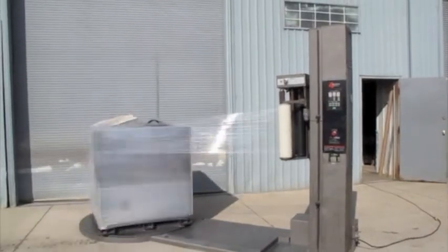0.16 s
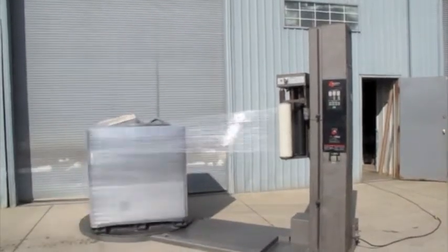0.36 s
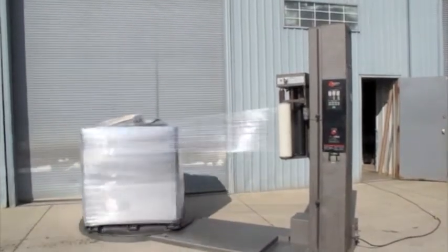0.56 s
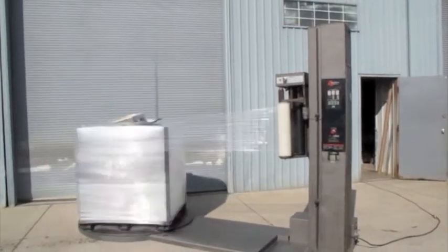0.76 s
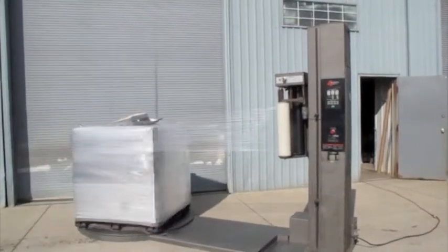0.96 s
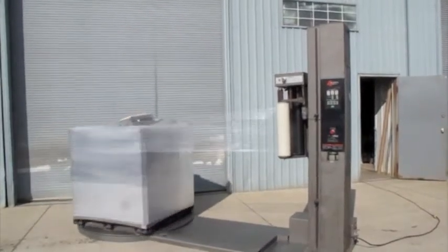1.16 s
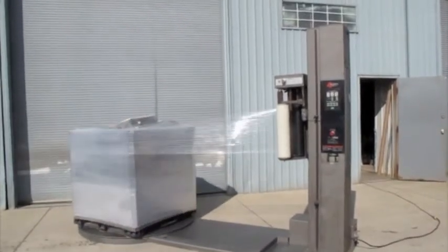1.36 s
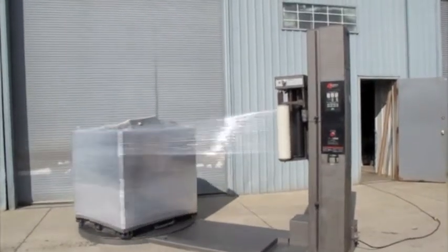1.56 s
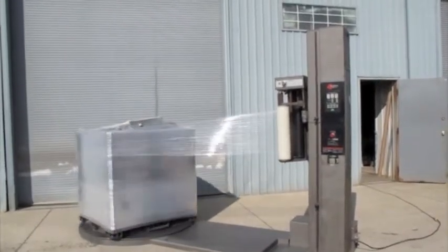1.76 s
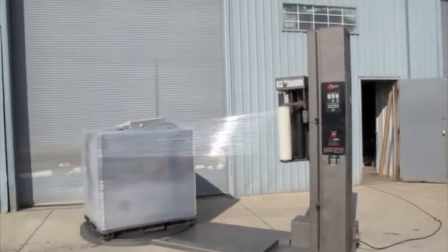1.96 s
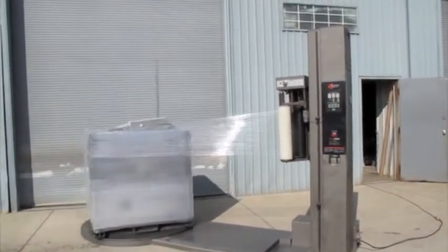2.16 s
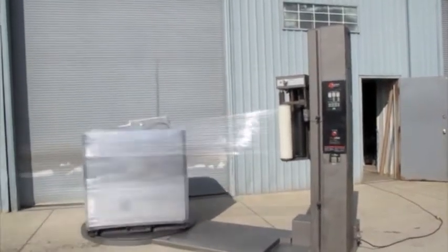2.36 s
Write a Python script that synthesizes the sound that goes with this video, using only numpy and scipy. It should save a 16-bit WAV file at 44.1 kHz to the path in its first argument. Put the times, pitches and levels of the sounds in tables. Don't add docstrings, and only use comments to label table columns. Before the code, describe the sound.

A machine motor drones low and swells while stretch film crackles and chain links knock on metal

```python
import sys
import numpy as np
from scipy import signal
from scipy.fft import rfft, irfft, next_fast_len
from scipy.io import wavfile
from scipy.ndimage import uniform_filter1d, map_coordinates

SR = 44100
rng = np.random.default_rng(int(sys.argv[2]) if len(sys.argv) > 2 else 0)


def invert_db(x):
    u = np.asarray(x, float) / 20
    return 10 ** u


def pcm_store(signal):
    levels = np.round(np.clip(np.atleast_2d(signal), -1, 1) * 32767)
    wavfile.write(sys.argv[1], SR, levels.astype(np.int16).T)


N = 111573

# frequency in Hz, density in dB per Hz.
MIC_SPECTRUM = [(3000, -16), (10000, 1), (15800, -15)]
# frequency in Hz, density in dB per Hz.
RUMBLE_SPECTRUM = [(10, 12), (22, 1.5), (42, 0), (60, -1), (90, 1), (140, -4), (230, -12), (350, -19)]
# time in seconds, gain in dB.
RUMBLE_SWELL = [(0, 0), (.4, 4.5), (.8, 3.5), (1.1, -1.5), (1.3, 2), (1.7, 3.5), (2.1, 2.5), (2.53, 3)]
# time in seconds, throb rate in Hz, level in dB.
ROLLER_THROB = [(0.0, 37.7, -20), (0.35, 39.1, -30), (0.53, 30.9, -31), (0.72, 40.3, -40),
                (0.87, 39.1, -31), (0.95, 32.8, -25), (1.55, 35.1, -23), (1.722, 29.2, -38),
                (1.87, 28.5, -57), (2.11, 34.42, -27), (2.4, 35.55, -23.5), (2.53, 31.8, -24)]
# frequency in Hz, rms level in dB, unsteadiness in dB.
ELECTRIC_TONES = [
    (120, -39, 1),
    (480, -46.5, .8),
    (560, -59, 2),
    (2932, -68, 2),
    (3654, -68, 2),
    (5387, -73, 2),
]
# time in seconds, level in dB.
SQUEAL_LEVEL = [
    (0, -68),
    (1.66, -68),
    (1.8, -56),
    (1.98, -55.5),
    (2.06, -69),
    (2.53, -69),
]
# time in seconds, level in dB.
BOOM_LEVEL = [(0, -43.5), (.15, -37), (.55, -44.5), (.8, -49), (1.3, -44), (2.2, -40.5), (2.53, -48)]
# frequency in Hz, width in Hz, level in dB.
DECK_MODES = [(231.5, 14, 0)]
# time in seconds, level in dB.
MOAN_LEVEL = [(0, -61), (.3, -37), (.5, -48), (.8, -47), (1.05, -32.5), (1.25, -42.5), (1.7, -51),
              (2.1, -45), (2.53, -55)]
# frequency in Hz, width in Hz, level in dB.
CASE_MODE = (101, 5, 0)
# start in seconds, level in dB, pitch in Hz, fade T60 in seconds.
PALLET_GROANS = [
    (.0, -35.5, 462, 0.17),
    (1.5, -48, 341.5, 1.3),
    (.33, -41.5, 726, 0.58),
    (.9, -44, 289, 1.2),
    (2.03, -38.5, 334.5, 0.3),
    (2.12, -37.5, 516, 0.38),
]
# start in seconds, peak in dB, pitch in Hz.
KNOCK_RINGS = [(.046, -45, 844), (.169, -52, 816), (.211, -38, 876), (.263, -38, 802), (.392, -55, 758),
               (.456, -42.5, 831), (.651, -36.5, 786), (.791, -36.5, 859), (.818, -42, 872),
               (.834, -35.5, 823), (1.002, -37, 790), (1.149, -34.5, 840), (1.19, -37.5, 806),
               (1.231, -46, 828), (1.372, -34, 832), (1.413, -39, 876), (1.587, -40, 870),
               (1.623, -35, 842), (1.687, -47, 788), (1.815, -33.5, 846), (1.954, -35.5, 816),
               (2.008, -47, 787), (2.11, -35.5, 827), (2.214, -40, 836)]
# start in seconds, peak in dB, fade T60 in seconds.
FILM_SNAPS = [(.115, -65, .12), (.253, -68, .12), (.345, -66, .1), (.38, -66, .15), (.46, -63, .08),
              (.755, -64, .15), (.88, -68, .1), (.98, -67, .12), (1.072, -66, 0.074), (1.134, -57, 0.074),
              (1.155, -56, 0.069), (1.785, -67, 0.15), (2.084, -56, 0.19)]
# frequency in Hz, density in dB per Hz.
SNAP_SPECTRUM = [(8500, -30), (10000, 0), (12500, -3), (14000, -16), (15800, -25)]
# start in seconds, peak in dB, fade T60 in seconds, treble over middle in dB.
FILM_PEELS = [(0.0014, -34, 0.11, -11.5), (0.064, -36.5, 0.6, -4), (0.108, -31.5, 0.12, -1.5),
              (0.252, -31.5, 0.13, 1), (0.2894, -40.5, 0.37, -2), (0.342, -33, 0.2, -7.5),
              (0.3755, -30.5, 0.25, 2.5), (0.5606, -40.5, 0.28, 0), (0.5894, -40, 0.22, -1),
              (0.6704, -44.5, 0.63, -2), (0.7503, -29.5, 0.17, -0.5), (0.839, -39.5, 0.59, -1),
              (0.921, -40, 0.43, -4.5), (0.979, -32, 0.12, 1), (1.07, -36.5, 0.21, -7),
              (1.1837, -36.5, 0.12, 0), (1.2594, -49, 0.6, 5), (1.3608, -39.5, 0.19, 3),
              (1.4064, -37.5, 0.23, -6), (1.503, -40, 0.52, 0.5), (1.705, -39, 0.17, 1),
              (1.752, -45, 0.12, 10), (1.93, -48, .3, 5), (1.7814, -41.5, 0.87, -5),
              (1.9686, -41, 0.34, 1.5), (2.0813, -27.5, 0.19, 0), (2.177, -35.5, 0.35, -5),
              (2.244, -50, 0.23, 3), (2.2714, -36.5, 0.12, 3), (2.343, -33.5, 0.24, 1),
              (2.4399, -39, 0.33, -2)]
# frequency in Hz, density in dB per Hz.
CRACKLE_MIDDLE = [(1200, 2), (2000, -14), (2600, 3.5), (3700, 0.5), (5000, -3), (6500, -4)]
# frequency in Hz, density in dB per Hz.
CRACKLE_TREBLE = [(3500, -73), (5500, -4.5), (8200, 1), (9700, -11.5), (12600, -52), (15800, -38)]
# time in seconds, level in dB.
PULL_LEVEL = [(0, -44), (.1, -46.5), (.28, -43), (.53, -48.5), (.74, -48), (.82, -49), (1.15, -46),
              (1.32, -48), (1.6, -47.5), (1.85, -49), (2.07, -45), (2.16, -49), (2.25, -42.5),
              (2.42, -46.5), (2.53, -49.5)]
# frequency in Hz, density in dB per Hz.
PULL_SPECTRUM = [(2000, 0), (3600, -3), (4200, -4), (4700, -2), (7900, -0.5), (9800, -16.5), (12600, -27),
                 (15800, -36)]
# frequency in Hz, density in dB per Hz.
GEAR_SPECTRUM = [(150, -34), (260, -0.5), (385, -7), (478, -1.5), (532, -6.5), (817, -8), (954, -11),
                 (1270, -10.5), (4500, -35), (5850, -64), (9900, -120)]
# frequency in Hz, width in Hz, level in dB.
MAST_MODES = [(813, 150, 10), (1397, 154, 2), (1788, 83, 3.5), (2400, 16, 1), (2514, 30, 1), (2680, 60, -1),
              (2908, 190, -2), (3250, 31, 4.5), (3570, 61, 3), (3670, 170, 1), (4670, 240, -4)]
# frequency in Hz, gain in dB.
RATTLE_DULLING = [(200, 1), (600, 1), (5000, 2), (9000, -15), (15800, -40)]
# start in seconds, peak in dB, upper modes over lower in dB, favoured mode in Hz.
CHAIN_KNOCKS = [(0.175, -45, -12, 2660), (0.39, -49, -20, 3700), (0.646, -44, -10, 1740),
                (0.794, -29, -22, 2450), (0.826, -27, -24, 1650), (0.993, -30, -17, 1834),
                (1.142, -26.5, -15.5, 2400), (1.196, -23.5, -41, 2710), (1.375, -25, -22, 2680),
                (1.506, -44, -6, 3060), (1.616, -25.5, -16.5, 2400), (1.811, -28.5, -14.5, 1940),
                (1.96, -29.5, -14, 3200), (2.107, -28, -18, 1730), (2.275, -38.5, -5.5, 2380)]
LOWER_MODE_DB = [-16, -4]
# frequency in Hz, density in dB per Hz.
SCRAPE_SPECTRUM = [(700, -20), (1200, -3), (3600, 0), (5000, -25)]
# time in seconds, level in dB.
MOTOR_LOAD = [
    (0, -32),
    (.5, -35),
    (.8, -34.5),
    (1.2, -31),
    (1.45, -25.5),
    (1.7, -23),
    (2.53, -23),
]
# multiple of the turning rate, level in dB, growth with load in dB per dB.
DRONE_ORDERS = [(1, -0.5, 0.88), (2, -7.5, 0.88), (3, -13.5, 1.18), (4, -29.5, 0.37), (5, -51, 1.4),
                (6, -35.5, 0.19), (7, -39.5, 0.33), (10, -39, 0.28)]


def unit(x):
    return x / np.sqrt(np.mean(x ** 2) + 1e-20)


def wobble(rate):
    knots = rng.standard_normal(int(N * 40 / SR) + 9)
    return map_coordinates(knots, [np.arange(N) * rate / SR])


def curve(rows):
    return np.interp(np.arange(N) / SR, *np.transpose(rows))


def sine(hz, sway=0):
    return np.sin(2 * np.pi * np.cumsum(np.broadcast_to(hz, N)) / SR + sway)


def filtered(x, response):
    m = next_fast_len(N + SR // 2)
    return irfft(rfft(x, m) * response(np.fft.rfftfreq(m, 1 / SR)), m)[:N]


def coloured(x, spectrum):
    f, db = np.transpose(spectrum)

    def gain(hz):
        return invert_db(np.interp(np.log(hz + 1), np.log(f + 1), db, -120, -120))

    return unit(filtered(x, gain))


def grainy(spread_db):
    size_db = spread_db * np.clip(rng.exponential(size=N), 0, 5)
    return unit(rng.standard_normal(N) * invert_db(size_db))


def patchy(x, patchy_db):
    z = signal.stft(x, nperseg=256)[2]
    field = uniform_filter1d(rng.standard_normal(z.shape), size=2, axis=0)
    field = uniform_filter1d(field, size=14, axis=1)
    return unit(signal.istft(z * invert_db(patchy_db * unit(field)), nperseg=256)[1][:N])


def bursts(starts, levels_db, t60s, rise_s):
    age = np.clip(np.arange(0, N + 8, 8) / SR - np.array(starts)[:, None], 0, None)
    shape = (1 - np.exp(-age / rise_s)) * invert_db(-60 * age / np.array(t60s)[:, None])
    envelopes = np.sqrt(invert_db(2 * np.atleast_2d(levels_db)) @ shape ** 2)
    return np.repeat(envelopes, 8, axis=1)[:, :N]


def resonate(x, modes):
    def response(f):
        total = 0
        for k, (hz, width, db) in enumerate(modes):
            peak = 1j * f * width / (hz * hz - f * f + 1j * f * width)
            total = total + (-1) ** k * invert_db(db) * peak
        return total

    return filtered(x, response)


def ring(mode):
    x = resonate(rng.standard_normal(N), [mode])
    x = unit(resonate(x, [mode]))
    loudness = np.abs(signal.hilbert(x, next_fast_len(N))[:N])
    return unit(x / (loudness + .45))


def microphone_hiss():
    return invert_db(-69) * coloured(rng.standard_normal(N), MIC_SPECTRUM)


def yard_rumble():
    return invert_db(-33.5 + curve(RUMBLE_SWELL)) * coloured(rng.standard_normal(N), RUMBLE_SPECTRUM)


def yard_echo(x):
    T60_S, FIRST_ECHO_S = .89, .012
    t = np.arange(SR // 2) / SR
    tail = rng.standard_normal(len(t)) * invert_db(-60 * t / T60_S) * (t > FIRST_ECHO_S)
    return signal.fftconvolve(x, tail / np.linalg.norm(tail))[:N]


def rollers():
    s, hz, db = np.transpose(ROLLER_THROB)
    level = invert_db(curve(np.c_[s, db]) - 6 + 1.3 * wobble(19))
    return np.sqrt(2) * level * sine(curve(np.c_[s, hz]), 1.2 * wobble(11))


def hum_and_whines():
    out = np.zeros(N)
    for hz, db, sway_db in ELECTRIC_TONES:
        out += np.sqrt(2) * invert_db(db + sway_db * wobble(9)) * sine(hz, .25 * wobble(6))
    return out


def brake_squeal():
    return invert_db(curve(SQUEAL_LEVEL)) * sine(5119, .33 * wobble(8.3))


def deck_boom():
    return invert_db(curve(BOOM_LEVEL)) * ring(*DECK_MODES)


def gearbox_moan():
    return invert_db(curve(MOAN_LEVEL)) * ring(CASE_MODE)


def pallet_groans():
    out = np.zeros(N)
    for s, db, hz, t60 in PALLET_GROANS:
        out += ring((hz, hz / 12, 0)) * bursts([s], [db], [t60], .011)[0]
    return out


def knock_rings():
    RISE_S, T60_S, PAIR_HZ = .005, .09, 60
    out, t = np.zeros(N + SR), np.arange(SR // 8) / SR
    fade = (1 - np.exp(-t / RISE_S)) * invert_db(-60 * t / T60_S)
    chances = rng.uniform(-1.5, 1, (len(KNOCK_RINGS), 2))
    for (s, db, hz), (turn, side) in zip(KNOCK_RINGS, chances):
        partner_hz = hz + PAIR_HZ * np.sign(side)
        pair = np.sin(2 * np.pi * hz * t) + .42 * np.sin(2 * np.pi * partner_hz * t + np.pi * turn)
        out[round(s * SR):][:len(t)] += invert_db(db + 7) * fade * pair
    return out[:N]


def film_snaps():
    s, db, t60 = np.transpose(FILM_SNAPS)
    return coloured(grainy(2.4), SNAP_SPECTRUM) * bursts(s, db, t60, .003)[0]


def film_peels():
    s, db, t60, tilt_db = np.transpose(FILM_PEELS)
    peak_db = db - 9
    middle, treble = bursts(s, [peak_db - tilt_db / 2, peak_db + tilt_db / 2], t60, .003)
    peel = middle * patchy(coloured(grainy(2.5), CRACKLE_MIDDLE), 1.8)
    peel += treble * patchy(coloured(grainy(2.5), CRACKLE_TREBLE), 2.2)
    return peel * invert_db(.74 * wobble(34))


def film_pull():
    level = invert_db(curve(PULL_LEVEL) - 3.5 + .56 * wobble(12.75))
    return level * patchy(coloured(grainy(2.5), PULL_SPECTRUM), 2.6)


def gear_noise():
    return invert_db(-40.5 + 1.07 * wobble(11.38)) * coloured(grainy(1.07), GEAR_SPECTRUM)


def mast_rattle():
    rattle = coloured(resonate(grainy(1), MAST_MODES), RATTLE_DULLING)
    return invert_db(-49 + 2.6 * wobble(21)) * rattle


def chain_knocks():
    KNOCK_DB, UPPER_DB, REACH_OCTAVES = -4.5, .5, .53
    RISE_S, T60_S = .0019, .15
    s, db, upper_db, near_hz = np.transpose(CHAIN_KNOCKS)
    t60 = np.full(len(s), T60_S)
    levels = []
    for (_, _, level), less_db in zip(MAST_MODES, LOWER_MODE_DB):
        levels.append(db + less_db + level - MAST_MODES[0][-1])
    for hz, _, level in MAST_MODES[2:]:
        distance = np.abs(np.log2(near_hz / hz)) / REACH_OCTAVES
        levels.append(db + upper_db + UPPER_DB + level - 6 * distance)
    blows = bursts(s, np.array(levels) + KNOCK_DB, t60, RISE_S)
    scrape_level = bursts(s, db + upper_db + KNOCK_DB - 3, t60, RISE_S)[0]
    scrape = coloured(grainy(.99), SCRAPE_SPECTRUM) * scrape_level
    return scrape + sum(ring(mode) * blow for mode, blow in zip(MAST_MODES, blows))


def motor_drone():
    TURN_HZ, DRIFT = 82.47, .0012
    load_db = curve(MOTOR_LOAD)
    full_db = load_db.max()
    phase = 2 * np.pi * np.cumsum(TURN_HZ * (1 + DRIFT * wobble(5.04))) / SR
    out = np.zeros(N)
    for order, db, growth in DRONE_ORDERS:
        level_db = full_db + db + growth * (load_db - full_db) + .6 * wobble(9)
        out += np.sqrt(2) * invert_db(level_db) * np.sin(order * phase + rng.uniform(0, 2 * np.pi))
    return out


def scene():
    background = yard_rumble() + rollers() + hum_and_whines() + brake_squeal()
    body = deck_boom() + gearbox_moan()
    near = pallet_groans() + knock_rings() + film_snaps() + film_peels() + film_pull()
    near += gear_noise() + mast_rattle() + chain_knocks()
    return (background + body + near + invert_db(-10.5) * yard_echo(near) + motor_drone())[None]


def low_pass(x):
    return signal.sosfilt(signal.butter(12, 15720, fs=SR, output="sos"), x)


def record(dry):
    return low_pass(dry + microphone_hiss())


dry = scene()
out = record(dry)
pcm_store(out)
```